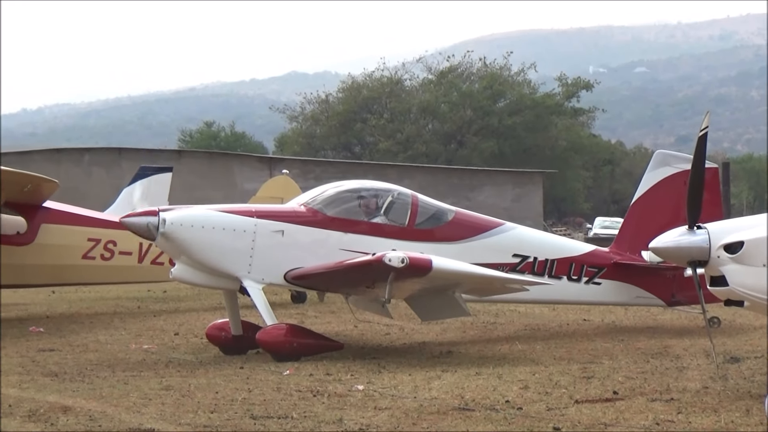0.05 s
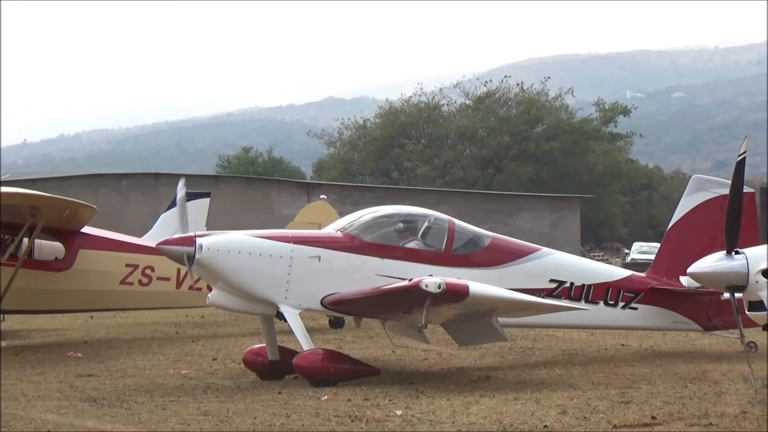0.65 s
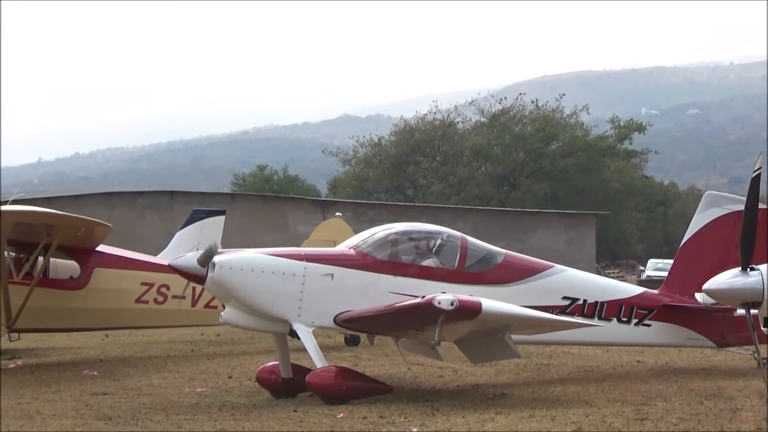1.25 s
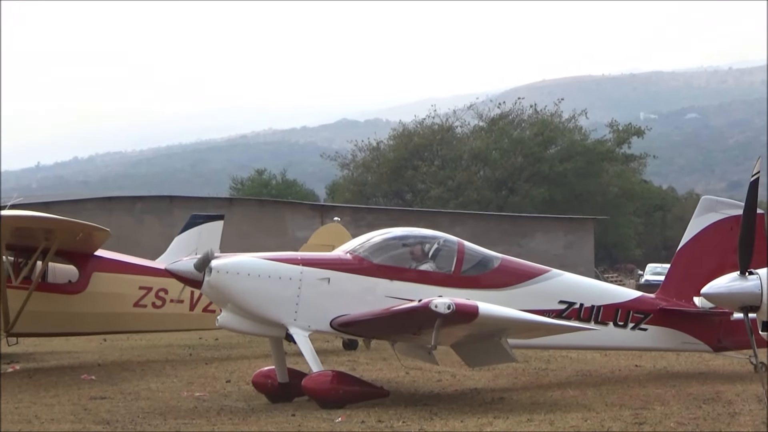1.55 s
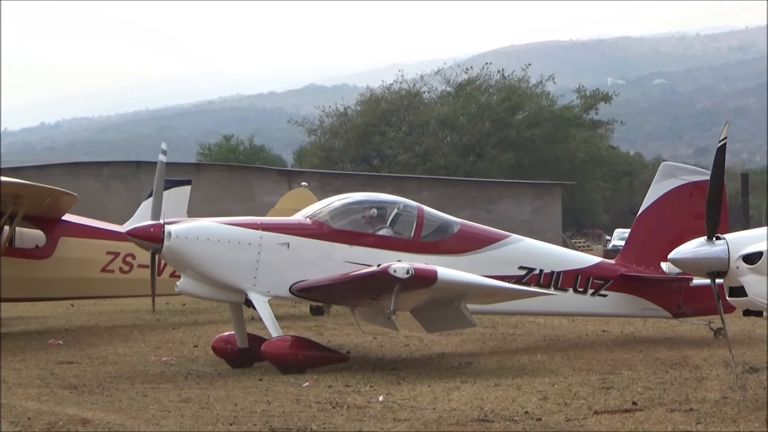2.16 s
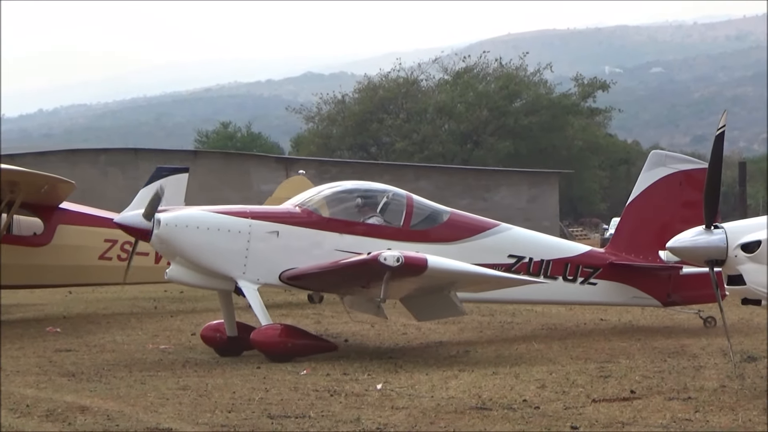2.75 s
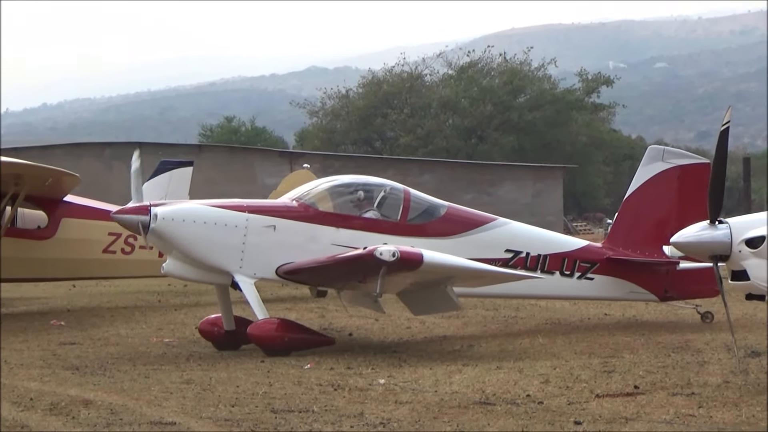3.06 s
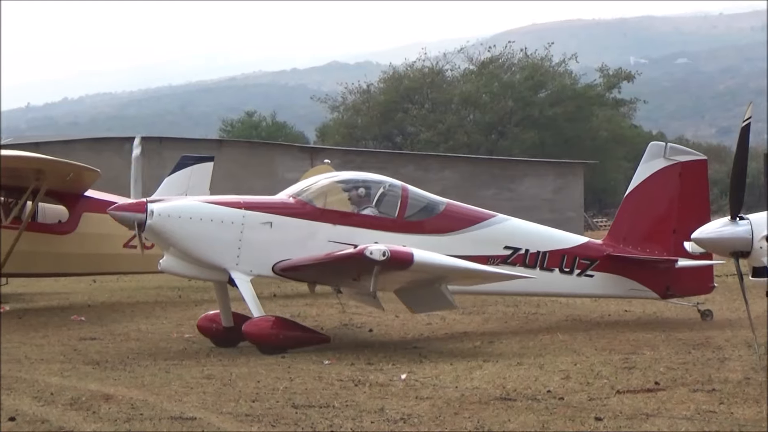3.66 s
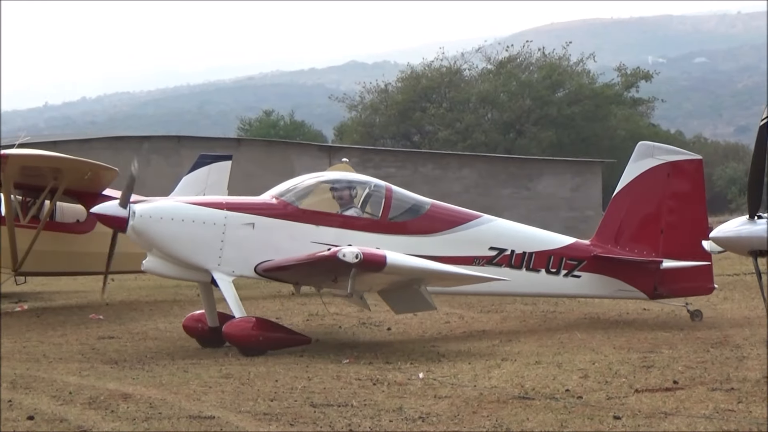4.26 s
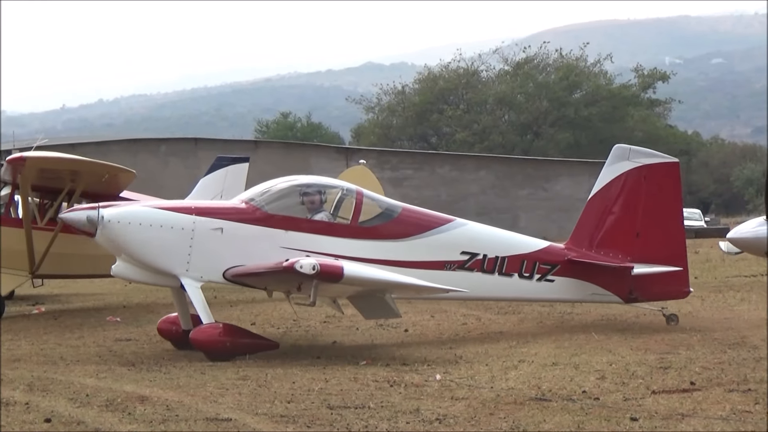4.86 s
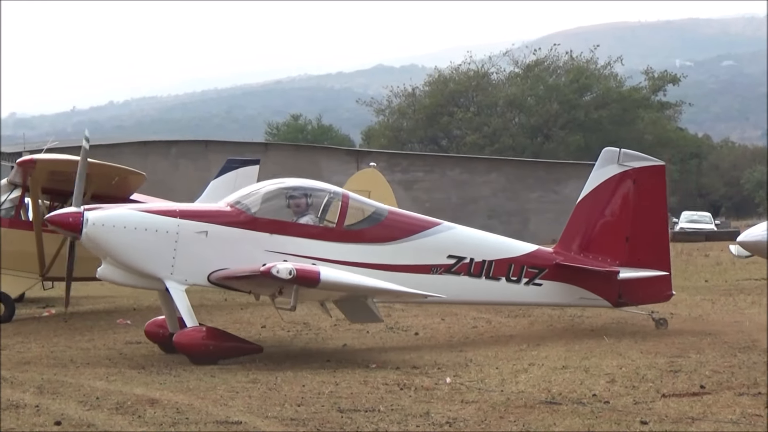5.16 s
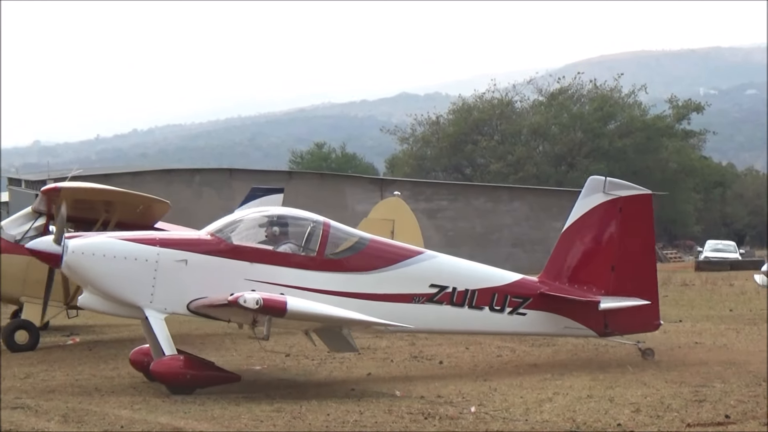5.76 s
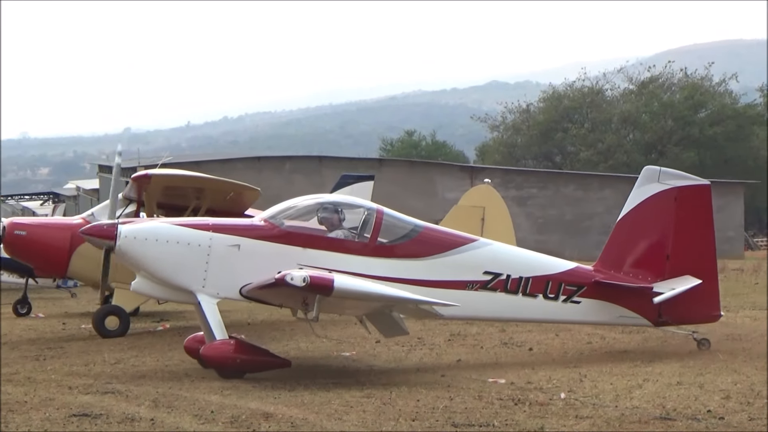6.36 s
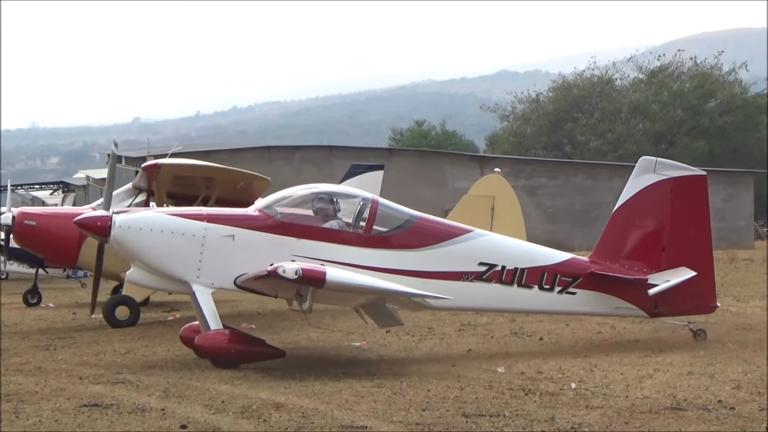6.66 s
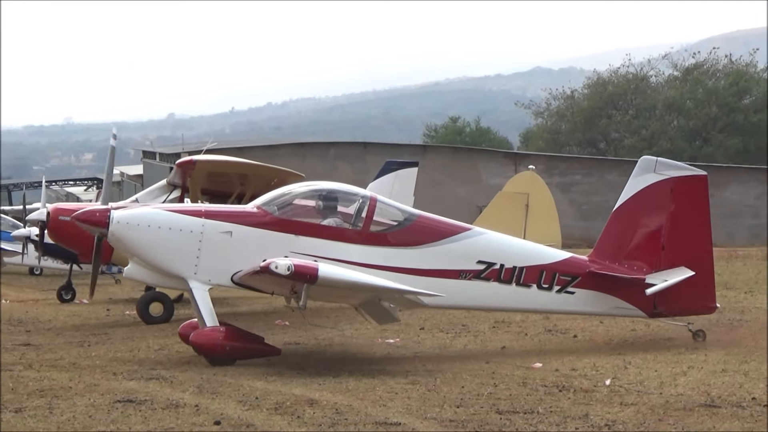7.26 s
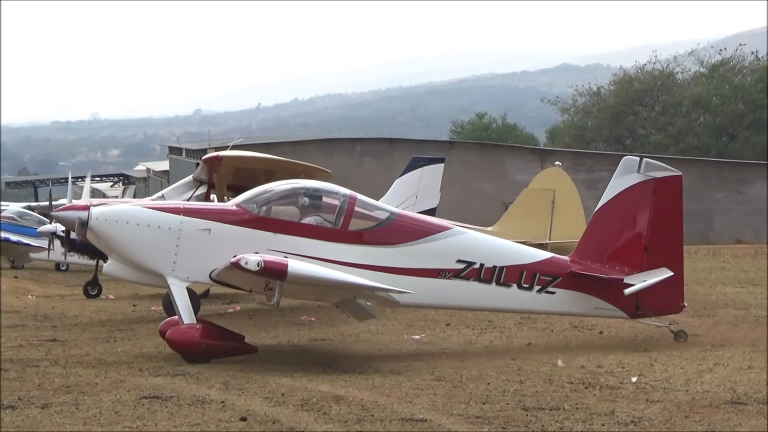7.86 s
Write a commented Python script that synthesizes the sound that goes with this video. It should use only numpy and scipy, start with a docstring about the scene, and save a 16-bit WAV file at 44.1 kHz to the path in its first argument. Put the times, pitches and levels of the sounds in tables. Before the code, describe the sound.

A light propeller plane rolls by at low throttle with a chugging exhaust and pulsing hiss, while wind buffets the microphone.

```python
"""A small four-cylinder piston aircraft taxis slowly past over dry grass, its engine just above idle.
The exhaust thumps with one cylinder louder than the rest, the propeller drones, and every firing spits
hiss over the clatter of the engine and the rush of the blades, all in step with one crankshaft.
A few thin pings sound early on, and a panel tinkles in the propeller wash as the nose comes into view.
Gusts of air buffet the microphone."""
import sys
import numpy as np
from scipy import signal
from scipy.fft import rfft, irfft
from scipy.io import wavfile
from scipy.ndimage import uniform_filter1d

SR = 44100
rng = np.random.default_rng(int(sys.argv[2]) if len(sys.argv) > 2 else 0)


def unload_wav(signal):
    """Save mono or channel-first audio to the path in sys.argv[1] as 16-bit WAV at rate SR, clipped to [-1, 1]."""
    wavfile.write(
        sys.argv[1],
        SR,
        np.round(np.clip(np.atleast_2d(signal).T, -1, 1) * 32767).astype(np.int16),
    )


N = 348390
TIME = np.arange(N) / SR
HZ = np.maximum(np.fft.rfftfreq(N, 1 / SR), 1)

# The bed of breeze on the microphone. Each row: time in seconds, level in dB.
BREEZE_LEVEL = [(0, -41), (1.1, -40.5), (2.4, -26.5), (3.0, -31.5), (4.2, -28.5), (6.2, -32.5),
                (7.05, -37.5), (7.9, -39)]
# Gusts. Each row: centre in seconds, peak in dB, half-length in seconds, tearing in dB against the gust.
WIND_GUSTS = [(2.294, -22.5, 0.041, -8), (2.414, -20, 0.06, -5), (2.618, -20, 0.019, -7),
              (2.811, -17, 0.022, -7), (2.855, -22.5, 0.012, 2), (3.31, -25, 0.011, 0),
              (3.617, -30, 0.042, 7.5), (3.753, -20.5, 0.032, -10), (3.828, -18, 0.011, -3),
              (4.157, -22.5, 0.022, 0), (4.3, -28, .02, 0), (5.24, -27, 0.03, -11),
              (5.512, -27.5, 0.025, 4), (5.755, -28, 0.024, 1), (5.94, -25, 0.027, -16),
              (6.443, -26, 0.013, -10)]
# Tone of the wind. Each row: frequency in Hz, relative level in dB.
WIND_EQ = [(20, -16), (45, -16), (75, -14), (130, -5), (240, 0), (340, -3.5), (500, -14), (750, -15.5),
           (1200, -48), (3000, -46), (8000, -85)]
# Modes of a ringing panel. Each row: pitch in Hz, width in Hz, level in dB.
PANEL_MODES = [(4260, 190, -43), (4400, 190, -42)]
# Metallic pings. Each row: centre in seconds, pitch in Hz, peak in dB.
METAL_PINGS = [(.76, 3520, -15), (.868, 3620, -16), (1.085, 3600, -19), (1.298, 4600, -23)]
# Engine speed, two firings and two blade passes to a turn. Each row: time in seconds, firings per second.
FIRING_RATE = [(0.0, 35.757), (0.39, 36.422), (1.28, 37.297), (2.27, 37.716), (2.68, 37.526),
               (3.24, 38.399), (3.51, 38.102), (4.45, 39.743), (4.87, 39.567), (5.19, 39.078),
               (5.42, 39.45), (6.09, 39.399), (6.41, 38.858), (6.93, 38.514), (7.46, 38.56), (7.9, 39.546)]
# Cylinders in firing order. Each row: thump accent in dB, spit accent in dB, lateness in firings.
FIRING_ORDER = [(0, 0.5, -0.14), (5.5, 1, -0.06), (-5.5, 1.5, -0.062), (-11, 1.5, -0.018)]
# The pass: the pipe mouth turns away and the propeller disc comes into view. Each row: time in seconds,
# thump fader in dB, boom fader in dB, swish strength, knock fader in dB, spit strength.
PASS_BY = [(0, -39, -31, 0.18, -24, 0.69), (2, -34.5, -35.5, 0.059, -24.5, 0.61),
           (3.9, -38.5, -36, 0.27, -26.5, 0.4), (4.1, -38, -37, 0.35, -25.5, 0.34),
           (4.6, -40, -33, 0.6, -24, .35), (4.75, -36.5, -49, 1.2, -24.5, 0.87),
           (5.6, -42, -41, 1.6, -28, 0.65), (6.4, -40, -39, 1.5, -26.5, 0.96),
           (7.9, -38.5, -34, 1.7, -26, 0.86)]
# Resonances of the blade swish. Each row: frequency in Hz, width in Hz, relative level in dB.
BLADE_MODES = [(346, 250, -1.5), (554, 155, -2), (1830, 360, 6), (2093, 240, 3)]
# Propeller boom. Each row: multiple of the blade rate, relative level in dB.
BOOM_TONES = [(1, -20.5), (2, -10), (3, -12)]
# Broad tone of the engine and blade noise. Each row: frequency in Hz, relative level in dB.
ENGINE_EQ = [(200, -1), (470, -10), (700, -1.5), (860, -7), (1400, -6.5), (2500, -7), (4050, -3.5),
             (5500, -7), (7000, -8.5), (8000, -6), (9500, -6), (11000, -12), (12500, -19), (15000, -30.5)]
# Peaks and dips from the cowling and the ground bounce. Each row: centre in Hz, width in Hz, lift in dB.
COWL_EQ = [(1100, 277, 9), (1616, 210, 2), (2276, 250, 2), (2460, 320, -3), (3170, 110, 3.5),
           (3580, 520, 2), (4056, 105, -6.5), (4280, 200, 2.5), (4900, 200, 4), (5250, 160, 3),
           (5620, 210, 5), (6120, 220, 5), (6700, 170, 4)]
# Side level of the engine noise: nearly centred, with a little more side from 1.4 to 3.3 kHz. Each row:
# frequency in Hz, side against mid in dB.
SIDE_EQ = [(200, -28), (700, -35), (1050, -33), (1400, -18), (2200, -19.5), (3300, -16.5), (4200, -26),
           (8000, -78), (12000, -97)]
# Faders for the engine noise. Each row: time in seconds, then clatter, rasp and hiss in dB before trim.
NOISE_FADERS = [(0.0, -18, -17.5, -17.6), (0.34, -17, -15, -16), (0.54, -16, -13.8, -13.5),
                (0.64, -17.6, -14.4, -17.5), (0.74, -18.6, -16.5, -13), (0.8, -21, -20, -16.6),
                (0.9, -17, -17, -17.5), (1.02, -18.5, -16.5, -17.1), (1.14, -16.5, -14.5, -16),
                (1.5, -17.5, -14.1, -16.5), (1.68, -20, -16.4, -17.8), (1.74, -17, -15.5, -17.5),
                (1.86, -17, -16.2, -18), (2.08, -16.5, -15.0, -15.8), (2.3, -17, -17, -17),
                (2.44, -19, -15.5, -19.5), (2.54, -16.9, -17.5, -15.5), (2.6, -18.3, -17.0, -19.5),
                (2.74, -17.5, -14.5, -15.5), (2.84, -18, -14.5, -15.5), (3.08, -16.3, -15, -17),
                (3.2, -15, -15, -15.5), (3.32, -18.5, -16.5, -17.5), (3.46, -16.5, -14.5, -18.5),
                (3.66, -16.5, -15.5, -16), (3.7, -19, -15, -18), (3.92, -17, -15, -17),
                (4.08, -18.5, -13.5, -13.5), (4.18, -17, -12.5, -16.0), (4.36, -17, -13.5, -14.2),
                (4.46, -17.5, -14, -15.5), (4.62, -17, -13, -13), (4.92, -19, -16.5, -15.5),
                (5.06, -18, -12.5, -16), (5.14, -19.5, -15.1, -14.5), (5.2, -16, -13, -17),
                (5.26, -19, -15.5, -16.5), (5.4, -17, -12.5, -15), (5.64, -21, -15.6, -18.5),
                (5.76, -17, -14.3, -15.5), (5.9, -17.5, -15, -17.7), (6.06, -19, -14.5, -15),
                (6.32, -21, -14.5, -16.5), (6.42, -20, -14.5, -15.8), (6.72, -19, -14, -14.8),
                (6.78, -21, -16, -14.5), (6.98, -18.5, -15.3, -15), (7.04, -22, -16.5, -15.5),
                (7.16, -18, -14.4, -15), (7.38, -17, -15.7, -15), (7.58, -19.5, -16.4, -15.2),
                (7.9, -17, -14.5, -14.5)]
# Bands of hiss. Each row: low edge in Hz, high edge in Hz, relative level in dB, spit strength.
HISS_BANDS = [(7050, 8700, -3.5, 4.7), (8860, 10700, -5.5, 14), (10430, 14500, -9, 3.4)]
# Fader for the exhaust's ring, chug and rumble. Each row: time in seconds, gain in dB.
EXHAUST_FADER = [(0, -31), (.45, -29.5), (.75, -34), (1.9, -31.5), (2.6, -33), (3.2, -36), (4.45, -30),
                 (5.3, -35), (5.8, -32), (6.3, -33.5), (6.75, -32.5), (7.9, -33.5)]
# Tone of the exhaust rumble. Each row: frequency in Hz, relative level in dB.
RUMBLE_EQ = [(20, -32), (45, -26), (75, -17), (130, 12), (185, -7), (280, -6), (420, -36), (700, -23),
             (2000, -71)]
# Resonances of the exhaust pipe. Each row: frequency in Hz, width in Hz, relative level in dB.
PIPE_MODES = [(154, 45, 4), (180, 14, 4), (300, 64, -7)]
# Exhaust tones; unequal cylinders give the quarter steps.
# Each row: multiple of the firing rate, relative level in dB.
CHUG_TONES = [(2.25, -20), (3.5, -14), (3.75, -12), (4, -2), (4.249, -11), (4.499, -12.5), (4.75, -12),
              (5, -6), (5.251, -12.5), (5.5, -23), (5.75, -24), (6, -20), (6.25, -14), (6.5, -18.5),
              (6.75, -9), (7, -13.5), (7.75, -14.5), (8, -16), (8.25, -16.5), (8.5, -16)]


def from_db(db):
    """Decibels to gain."""
    return 10 ** (np.asarray(db) / 20)


def rms_one(x):
    """Scale to unit power."""
    return x / np.sqrt(np.mean(x ** 2) + 1e-20)


def automation(rows):
    """One curve, sample by sample, for each column after the time."""
    seconds, *columns = np.transpose(rows)
    return [np.interp(TIME, seconds, column) for column in columns]


def eq_curve(points):
    """Join EQ points into a gain at every frequency."""
    hz, db = np.transpose(points)
    return from_db(np.interp(np.log(HZ), np.log(hz), db))


def shaped(x, gain):
    """Apply an EQ curve and scale to unit power."""
    return rms_one(irfft(rfft(x) * gain, N))


def drift(per_s):
    """A smooth random modulator of spread 1, moving about per_s times a second."""
    count = N // 16
    hz = np.fft.rfftfreq(count, N / count / SR)
    slow = irfft(rfft(rng.standard_normal(count)) / (1 + (hz / per_s) ** 2), count)
    return np.interp(TIME, np.linspace(0, TIME[-1], count), rms_one(slow))


def resonate(x, hz, width_hz):
    """A resonance with unity gain at its peak."""
    r = np.exp(-np.pi * width_hz / SR)
    feedback = [1, -2 * r * np.cos(2 * np.pi * hz / SR), r * r]
    return signal.lfilter(np.array([1, 0, -1]) * (1 - r * r) / 2, feedback, x)


def gusts(flutter_db, flutter_per_s, breeze_tear_db):
    """Envelopes of the wind and its tearing: a fluttering breeze under bell-shaped gusts."""
    breeze_db, = automation(BREEZE_LEVEL)
    power = from_db(breeze_db + flutter_db * drift(flutter_per_s)) ** 2
    tear_power = power * from_db(breeze_tear_db) ** 2
    for centre_s, peak_db, half_s, tear_db in WIND_GUSTS:
        gust = from_db(peak_db) ** 2 * np.exp(-np.minimum(((TIME - centre_s) / half_s) ** 2, 20))
        power += gust
        tear_power += gust * from_db(tear_db) ** 2
    return np.sqrt(power), np.sqrt(tear_power)


def wind(lumpy_db):
    """Lumpy low noise, different at each microphone port; gusts tear into a brighter thud."""
    strength, tearing = gusts(flutter_db=2, flutter_per_s=24, breeze_tear_db=-13)
    eddies = rng.standard_normal((2, 2, N)) * from_db(lumpy_db * drift(40))
    thud = signal.sosfilt(signal.butter(2, [280, 540], "band", fs=SR, output="sos"), eddies[1])
    return strength * shaped(eddies[0], eq_curve(WIND_EQ)) + tearing * rms_one(thud)


def panel_ring(flicker_db, flicker_per_s):
    """Sheet metal shaken by the propeller wash tinkles in short bursts, each mode on its own."""
    _, _, wash, _, _ = automation(PASS_BY)
    out = 0
    for hz, width, db in PANEL_MODES:
        bursts = from_db(flicker_db * np.minimum(drift(flicker_per_s), 1.2))
        shaking = np.sqrt(wash) * bursts * rng.standard_normal(N)
        out += from_db(db) * rms_one(resonate(resonate(shaking, hz, width), hz, width))
    return out


def pings(half_s):
    """Short, thin metallic pings that swell and fade."""
    out = 0
    for centre_s, hz, db in METAL_PINGS:
        swell = np.exp(-np.minimum(((TIME - centre_s) / half_s) ** 2, 30))
        out += from_db(db) * swell * np.sin(2 * np.pi * hz * TIME)
    return out


def blade_swish(power):
    """Air shed by the blades swells with a power envelope and sings in a few broad resonances."""
    air = np.sqrt(power) * rng.standard_normal(N)
    return rms_one(sum(from_db(db) * resonate(resonate(air, hz, width), hz, width)
                       for hz, width, db in BLADE_MODES))


def propeller_boom(crank, lead_firings, waver_db, wobble_rad):
    """Low blade tones locked just ahead of the crank, each wavering in the churned air."""
    _, boom_db, *_ = automation(PASS_BY)
    out = 0
    for multiple, db in BOOM_TONES:
        phase = 2 * np.pi * multiple * (crank + lead_firings) + wobble_rad * drift(19)
        out += from_db(db + waver_db * drift(7.1)) * np.sqrt(2) * np.sin(phase)
    return from_db(boom_db) * out


def firings(crank, jitter_firings):
    """The cylinders fire in turn: the sample of each firing, with its thump and spit accents in dB."""
    number = np.arange(1, int(crank[-1]))
    thump_db, spit_db, late = np.array(FIRING_ORDER)[number % len(FIRING_ORDER)].T
    at = np.searchsorted(crank, number + late + jitter_firings * rng.standard_normal(len(number)))
    return np.clip(at, 0, N - 1), thump_db, spit_db


def strikes(at, db, spread_db):
    """One click per firing; no two burn alike."""
    clicks = np.zeros(N)
    clicks[at] = from_db(db + spread_db * rng.standard_normal(len(at)))
    return clicks


def spits(at, spit_db, rise_s, fall_s, spread_db):
    """Power envelope of the gas bursts: a quick swell and a short tail at each firing."""
    t = np.arange(-SR // 50, SR // 50) / SR
    burst = np.where(t < 0, np.exp(-(t / rise_s) ** 2), np.exp(-np.abs(t / fall_s)))
    return signal.fftconvolve(strikes(at, spit_db, spread_db) ** 2, burst, "same")


def cowl_noise(power, low_hz, high_hz, grain_db):
    """Grainy stereo turbulence, coloured by the cowling, pulsing with a power envelope."""
    lift_db = sum(db * np.exp(-2 * ((HZ - hz) / width) ** 2) for hz, width, db in COWL_EQ)
    band = 1 / np.sqrt((1 + (low_hz / HZ) ** 16) * (1 + (HZ / high_hz) ** 16))
    colour = eq_curve(ENGINE_EQ) * from_db(lift_db) * band
    power = np.maximum(power, 1e-6) * from_db(grain_db * np.minimum(drift(190), 2)) ** 2
    envelope = np.sqrt(power / uniform_filter1d(power, size=6900))  # keeps the pulse, evens the level
    mid, side = shaped(envelope * rng.standard_normal((2, N)), colour)
    side = irfft(rfft(side) * eq_curve(SIDE_EQ), N)
    return np.array([mid + side, mid - side])


def engine_noise(crank, at, spit_db, clatter_trim_db, rasp_trim_db, hiss_trim_db):
    """Knock, clatter, rasp and hiss, with a spit of gas on each firing and a blade swish in between."""
    clatter_db, rasp_db, hiss_db = automation(NOISE_FADERS)
    _, _, wash, knock_db, exposure = automation(PASS_BY)
    knock_db += 0.75 * (clatter_db - clatter_db.mean())  # the knock rides along with the clatter
    dull_spit = exposure * spits(at, spit_db, rise_s=0.0014, fall_s=0.0019, spread_db=1.5)
    swish = wash * np.sin(np.pi * crank) ** 4
    churn = from_db(1.1 * drift(27))
    blades = blade_swish(swish + 0.24 * wash ** 2)
    knock = cowl_noise(1 + 0.4 * dull_spit, 185, 1390, grain_db=2.5)
    clatter = cowl_noise(churn + 1.4 * dull_spit + 0.5 * swish, 1413, 2800, grain_db=1.8)
    rasp = cowl_noise(churn + 2.5 * dull_spit + 0.99 * swish, 2080, 6800, grain_db=1.9)
    hiss = 0
    for low_hz, high_hz, db, strength in HISS_BANDS:  # bands vary apart, so each spit has its own colour
        sharp_spit = exposure * spits(at, spit_db, rise_s=0.00089, fall_s=0.0026, spread_db=1.9)
        power = churn + strength * sharp_spit + 1.25 * swish
        hiss += from_db(db) * cowl_noise(power, low_hz, high_hz, grain_db=2.5)
    return (from_db(-31) * blades + from_db(knock_db) * knock
            + from_db(clatter_db + clatter_trim_db) * clatter
            + from_db(rasp_db + rasp_trim_db) * rasp
            + from_db(hiss_db + hiss_trim_db) * hiss)


def chug(crank, note_hz, note_width_hz, note_lift_db, waver_db, wobble_rad):
    """Exhaust tones sag once a cycle, about one firing before the loud thump."""
    rate, = automation(FIRING_RATE)
    sag_at_firings, quarter_lag_turns = 3.85, 0.62
    out = 0
    for multiple, db in CHUG_TONES:
        smear_turns = 0.125 * (multiple - 4.5) ** 2  # the pipe smears each beat, low tones last
        is_quarter_step = round(4 * multiple) % 4 > 0
        turns = multiple * (crank - sag_at_firings) + smear_turns - quarter_lag_turns * is_quarter_step
        # a tone swells as engine speed carries it through the pipe's note
        lift_db = note_lift_db * np.exp(-((multiple * rate - note_hz) / note_width_hz) ** 2)
        level = from_db(db + lift_db + waver_db * drift(1.8))
        out -= level * np.sqrt(2) * np.sin(2 * np.pi * turns + wobble_rad * drift(10))
    return out


def exhaust(crank, at, thump_db, puff_s):
    """Each firing is a short suck-and-push of pressure; the pipe rings on over a chug and a rumble."""
    drone_db, = automation(EXHAUST_FADER)
    puff_db, *_ = automation(PASS_BY)
    clicks = strikes(at, thump_db, spread_db=2)
    t = np.arange(-SR // 50, SR // 50) / SR / puff_s
    puffs = signal.fftconvolve(clicks, t * np.exp(-t * t / 2), "same")
    low_cut = signal.butter(4, 58, "high", fs=SR, output="sos")  # a small pipe radiates no deep bass
    puffs = rms_one(signal.sosfilt(low_cut, puffs))
    ring = rms_one(sum(from_db(db) * resonate(clicks, hz, width) for hz, width, db in PIPE_MODES))
    rumble = shaped(rng.standard_normal((2, N)), eq_curve(RUMBLE_EQ))  # scattered back from all round
    tones = chug(crank, note_hz=189.8, note_width_hz=11, note_lift_db=4, waver_db=0.5, wobble_rad=0.1)
    drone = from_db(-13.5) * ring + tones + from_db(-9.5) * rumble
    return from_db(puff_db) * puffs + from_db(drone_db) * drone


def scene():
    """The crankshaft drives exhaust, propeller and engine noise; pings, panel and wind lie on top."""
    rate, = automation(FIRING_RATE)
    crank = np.cumsum(rate) / SR + 0.32  # position counted in firings
    at, thump_db, spit_db = firings(crank, jitter_firings=0.02)
    aircraft = exhaust(crank, at, thump_db, puff_s=0.0013)
    aircraft += propeller_boom(crank, lead_firings=0.16, waver_db=2.5, wobble_rad=0.1)
    aircraft += engine_noise(crank, at, spit_db, clatter_trim_db=-2, rasp_trim_db=-3, hiss_trim_db=-2.07)
    aircraft += pings(half_s=0.0066) + panel_ring(flicker_db=11, flicker_per_s=20)
    return aircraft + wind(lumpy_db=0.5)


def record(dry):
    """Round off the rare highest peaks, then cut the deep bass and the very top."""
    ceiling, low_cut_hz, high_cut_hz = 0.82, 22, 15300
    rounded = dry / (1 + (dry / ceiling) ** 8) ** (1 / 8)
    x = signal.sosfilt(signal.butter(2, low_cut_hz, "high", fs=SR, output="sos"), rounded)
    return signal.sosfilt(signal.ellip(12, 0.1, 90, high_cut_hz, fs=SR, output="sos"), x)


dry = scene()
out = record(dry)
unload_wav(out)
```